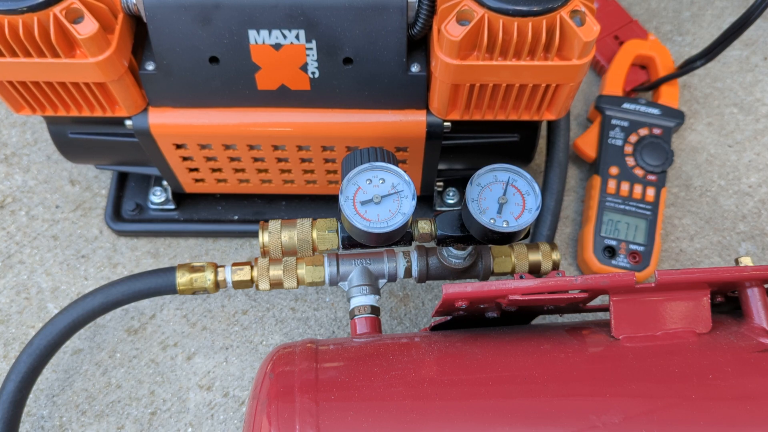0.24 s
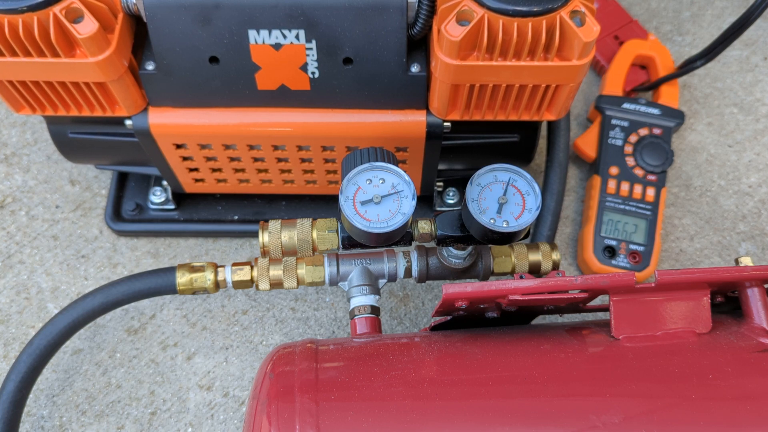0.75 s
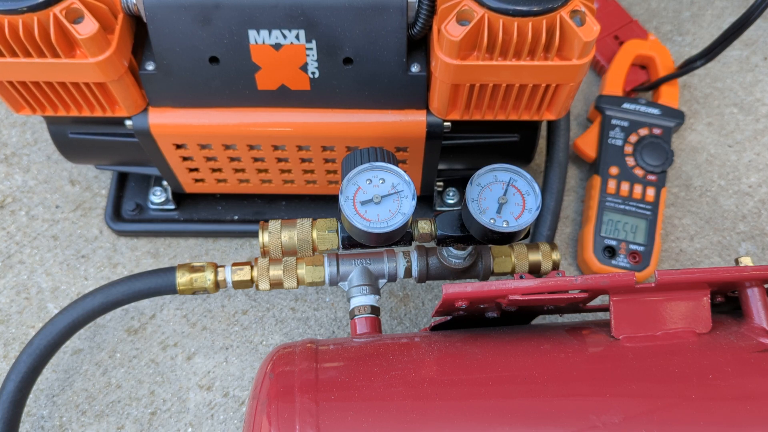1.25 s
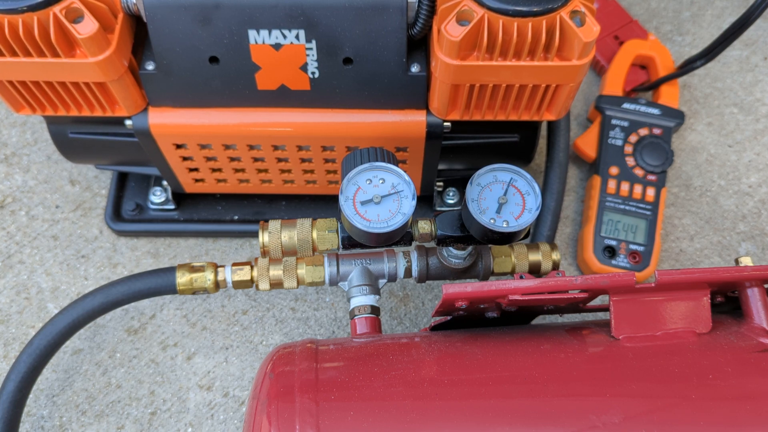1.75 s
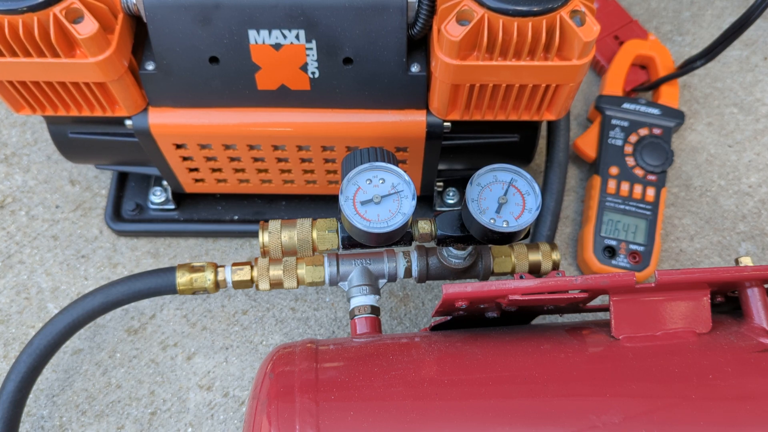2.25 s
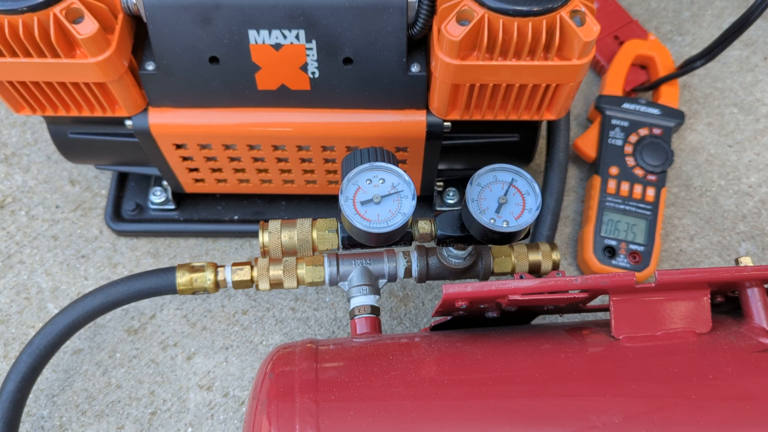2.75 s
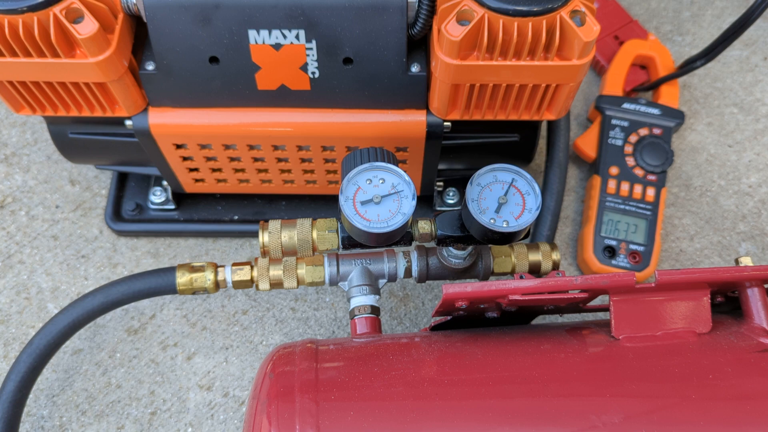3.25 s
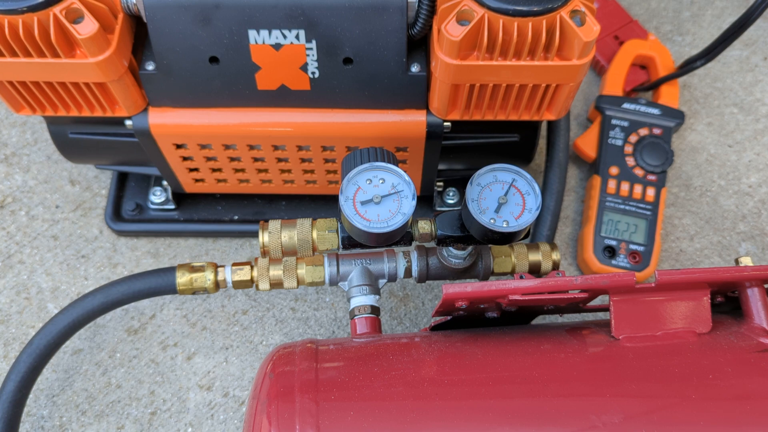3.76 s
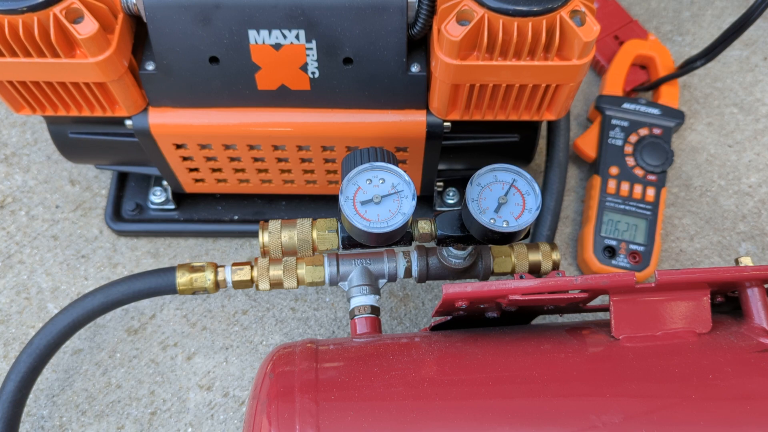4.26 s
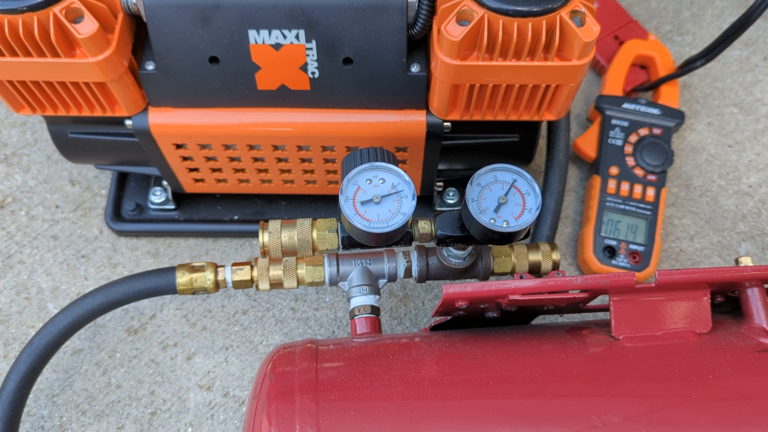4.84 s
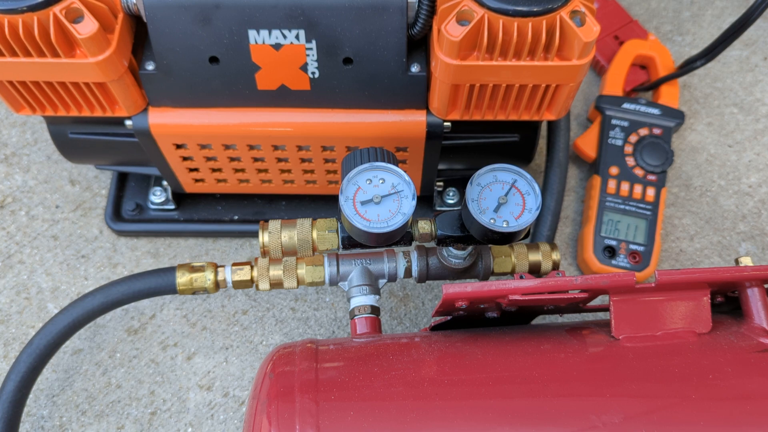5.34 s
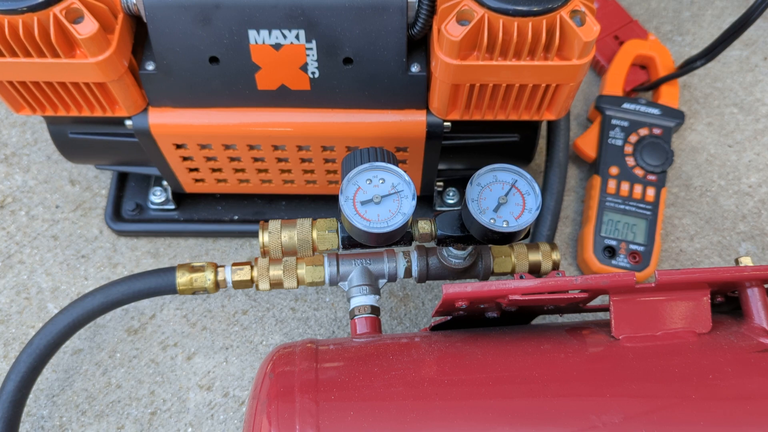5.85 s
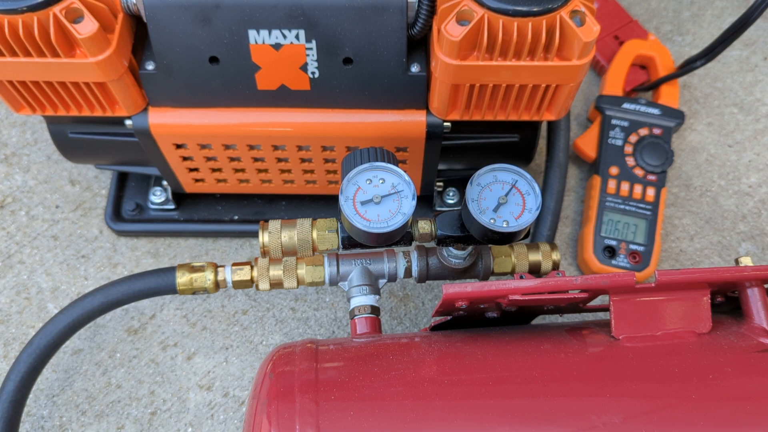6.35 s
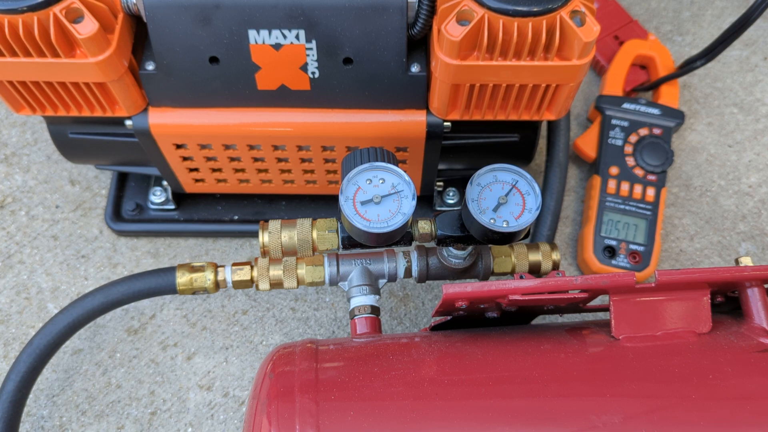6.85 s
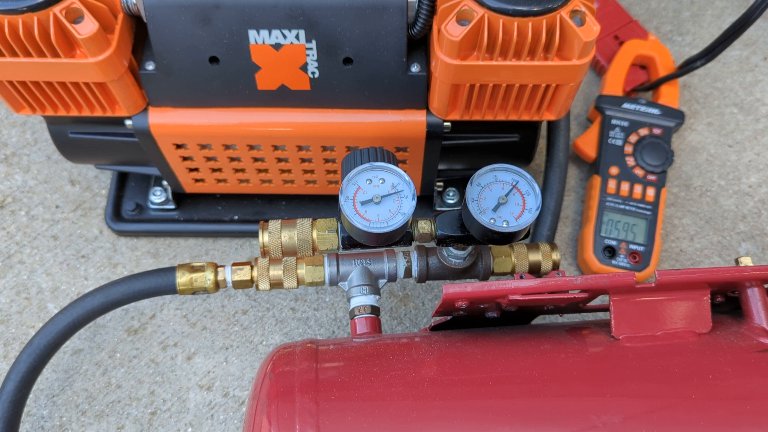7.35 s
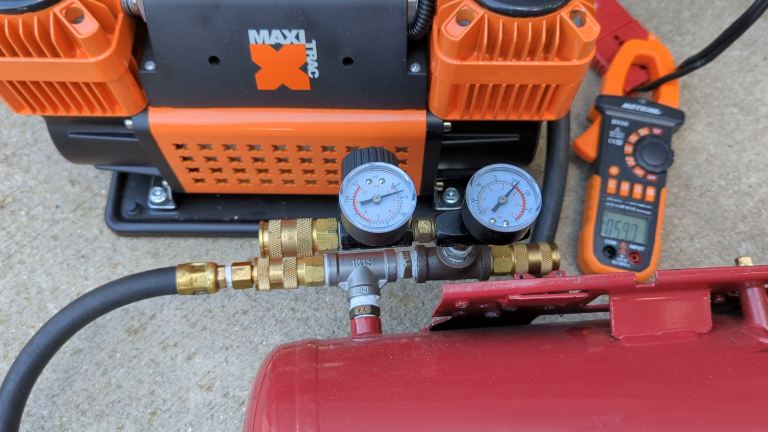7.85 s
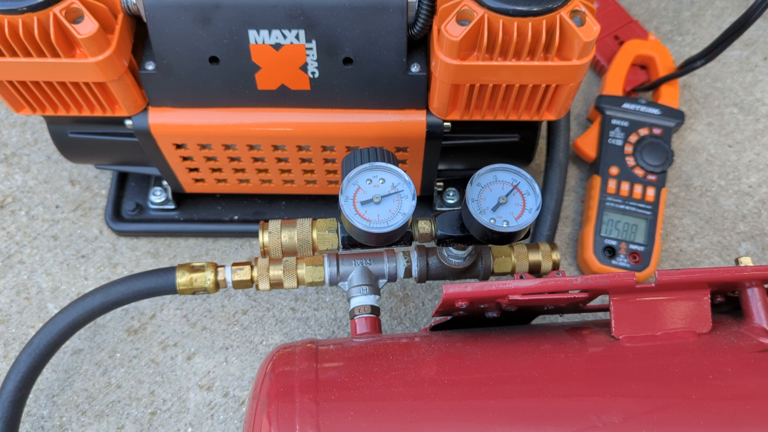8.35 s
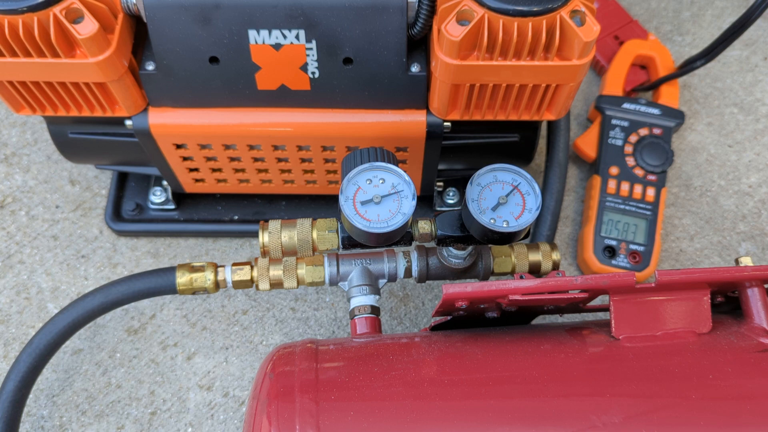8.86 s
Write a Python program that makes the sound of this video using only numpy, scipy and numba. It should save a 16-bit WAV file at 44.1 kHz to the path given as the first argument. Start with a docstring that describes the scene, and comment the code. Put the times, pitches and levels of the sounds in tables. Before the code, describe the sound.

From 0 seconds the compressor is already at full loudness and it never stops through about 9 seconds. Its piston knocks come roughly 73 times a second, fusing into a hard, rough, buzzing drone, strongest from low bass at about 150 Hz through a nasal midrange near 600 to 2,200 Hz. Pitch climbs smoothly by only about two thirds of a semitone, to 75 turns a second. Valve hiss pulses four times per turn, too fast to count, with shimmering metallic rattle above 4 kHz whose grain slowly changes. Hiss and rattle are fullest near 0.6 seconds, dip around 5, and recover slightly by 6. The tonal balance shifts gradually until about 6 seconds, then holds. A slightly left-leaning eight-cylinder engine idles far below, a low burble near 50 to 150 Hz with faint rustling ticks six times a second. Close, wide, dry, outdoors, nearly saturated.

```python
"""On a concrete floor, a small twin-piston compressor pumps a tank while an eight-cylinder engine idles beside it.
The compressor is a stack of tones at multiples of its slowly rising shaft rate: one knocking wave every turn.
Noise that puffs four times a turn is the air hiss; a slowly changing pattern of strikes rings the metal as rattle.
The engine is a comb of low tones at multiples of its cycle rate, with a rustle of noise once a cycle.
"""
import sys
import numpy as np
from scipy import signal
from scipy.fft import rfft, irfft
from scipy.io import wavfile
from scipy.ndimage import uniform_filter1d, map_coordinates
from numba import njit

SR = 44100
rng = np.random.default_rng(int(sys.argv[2]) if len(sys.argv) > 2 else 0)


def dump(signal):
    """Clip the signal to [-1, 1] and save it as 16-bit WAV at the path in sys.argv[1]."""
    limited = np.clip(np.atleast_2d(signal).T, -1, 1)
    pcm = np.round(limited * 32767).astype(np.int16)
    wavfile.write(sys.argv[1], SR, pcm)


N = 401310  # length in samples
STEP = 256  # samples between points of the slow control grid

# Exhaust tones of the engine: cycle_multiple (8 is the firing rate), level_db (rms, before pan and swell)
EXHAUST_TONES = [(8, -39.5), (10, -43), (12, -65), (13, -35), (14, -43), (15, -44.5), (16, -28.5),
                 (18, -43), (19, -44.5), (20, -46), (21, -34), (22, -35.5), (24, -31), (25, -34),
                 (26, -39.5), (28, -56), (29, -49.5), (30, -40.5), (31, -46), (32, -40), (34, -50),
                 (35, -48), (44, -49), (48, -51)]
# Swell of the engine: time_s, swell_db
ENGINE_SWELL = [(0, 0.5), (2, 0), (4, -1.5), (6, -1.5), (9.1, -1)]
# Colour of the air hiss, before its swell: pitch_hz, left_db_per_hz, right_db_per_hz
HISS_COLOUR = [(25, -86, -88), (45, -76, -65), (100, -62, -61), (317, -61, -56.5), (547, -65, -63),
               (950, -63.5, -55.5), (1550, -62.5, -61.5), (2070, -54.5, -62), (2660, -67, -62.5),
               (3530, -70, -68), (4630, -79, -72), (6230, -73.5, -74.5), (8300, -73, -79),
               (8500, -71.5, -77), (16000, -78, -73.5)]
# Swell of hiss and rattle: time_s, swell_db
AIR_SWELL = [(0, 0), (.6, 1), (2, 0.1), (2.7, -1.1), (5.2, -3), (6.2, -1.2), (9.1, -1.5)]
# Puffs as the valves open: place_turns, fade_turns, size (relative to the steady hiss)
VALVE_PUFFS = [(.04, 0.06, 0.6), (0.249, 0.053, 0.5), (.54, 0.099, 0.68), (.8, 0.082, 1)]
# Ringing of cylinder fins and valve plates, before pan and swell:
# pitch_hz, width_hz, low_fill_db_per_hz, high_fill_db_per_hz
METAL_RINGS = [(4150, 310, -72, -64), (5160, 330, -72, -71.5), (5940, 300, -89, -80),
               (6160, 340, -68.5, -70), (7150, 380, -72.5, -74), (8750, 170, -65.5, -73),
               (9120, 240, -76, -71), (10300, 550, -77, -80), (11640, 580, -82, -72.5),
               (12500, 800, -75, -77), (14100, 1500, -73, -74), (15400, 300, -72, -74)]
# Speed of the compressor shaft: time_s, turns_per_s
SHAFT_SPEED = [(0.0, 72.54), (0.25, 72.59), (1.25, 73.1), (2.25, 73.35), (2.95, 73.6), (3.1, 73.87),
               (4.5, 74.21), (5.5, 74.5), (9.1, 75.285)]
# Swell of the knocks: time_s, swell_db
KNOCK_SWELL = [(0, -1.2), (1.5, 0), (3, -0.27), (4.5, -1.1), (6, -0.85), (7.5, -1), (9.1, -1.35)]
# Knock tones, rms before swell: shaft_multiple, low_fill_left_db, low_fill_right_db,
# high_fill_left_db, high_fill_right_db
KNOCK_TONES = [(1, -41, -37, -39, -35.5), (2, -21.5, -23, -24.5, -25), (3, -38, -38, -30.5, -37),
               (4, -23, -23, -26, -24.5), (5, -27.5, -35.5, -29.5, -36.5), (6, -31, -40, -32, -62),
               (7, -71, -29, -32, -37.5), (8, -19, -33, -26.5, -37.5), (9, -24, -29, -19, -22.5),
               (10, -16.5, -14, -22, -27), (11, -27, -24, -23.5, -23), (12, -14.5, -48.5, -23.5, -22),
               (13, -42.5, -18.5, -22, -23), (14, -41.5, -18, -38.5, -22), (15, -22.5, -20.5, -24, -23),
               (16, -23.5, -29.5, -36, -30), (17, -58, -35.5, -34, -47), (18, -28, -24.5, -29.5, -26.5),
               (19, -31, -43, -29.5, -51), (20, -39, -42.5, -34, -34), (21, -41, -25.5, -23, -50),
               (22, -16.5, -22.5, -30.5, -38.5), (23, -30, -27, -30, -32), (24, -41, -79, -25, -27),
               (25, -63, -43, -28, -38), (26, -30.5, -35, -19, -48), (27, -33, -29, -47, -49),
               (28, -21.5, -28, -20.5, -23.5), (29, -34, -36, -28.5, -72), (30, -23.5, -45, -22, -33),
               (31, -32.5, -33, -38, -33), (32, -32.5, -27.5, -32, -39), (33, -42, -54, -44, -48),
               (34, -49, -32, -47.5, -33), (35, -36, -74, -30.5, -57), (36, -32.5, -55, -29, -28),
               (37, -63, -34.5, -39.5, -33.5), (38, -28, -31, -34, -62), (39, -35.5, -80, -45.5, -40.5),
               (40, -61, -53, -51, -69), (41, -29, -57.5, -37.5, -58)]
# When in the turn each pitch range of the knock arrives: pitch_hz, arrival_turns, odd_multiple_shift_rad
# The shift of odd multiples carries the unlikeness of the cylinders; half a wave makes the other one stronger.
KNOCK_ARRIVAL = [(300, .475, -1), (370, .615, -1.5), (745, .65, 0), (820, .52, 0), (965, .545, -2),
                 (1300, .53, -2.6), (1420, .35, -3.2), (1850, .35, -4.9), (1960, .53, -4.7),
                 (2250, .57, -4.7)]
# How far the knock at the left microphone runs ahead of the right: pitch_hz, lead_rad
LEFT_LEAD = [(74, 0.17), (370, 0.25), (480, 2), (600, 0.055), (800, 1.27), (960, 0.68), (1110, 1.48),
             (1200, 1.85), (1340, 1.18), (1460, 2.9), (1630, 2.75), (1920, 1.68), (2070, 1.7), (2370, 0.15),
             (2550, 1.84), (2900, 2.77)]
# Knock tones that swell or sink on the way: shaft_multiple, half_fill_db
MIDWAY_SWELL = [(8, -0.5), (10, -2.5), (12, 2), (14, -3), (15, -2), (16, 2), (17, 5.5), (19, -1), (21, -1),
                (22, 0.5), (23, 3), (25, -5), (27, 1.5), (30, 1.5), (31, -1.5), (34, -4), (35, -5), (36, 4),
                (38, -8.5), (39, -5), (41, 4.5)]

# Engine: four-stroke cycles per second, and place in the cycle at the start
ENGINE_CYCLE_HZ, ENGINE_START_CYCLES = 6.0066, .0098
ENGINE_WAVER_DB, ENGINE_PAN_DB = -0.5, 1.2  # spread of the random drift; left louder than right
TICK_DB, TICK_HZ, TICK_FADE_CYCLES = -45, 7000, 0.088  # valve-train rustle, before the engine swell
ALIKE_HZ = 393  # the likeness of left and right hiss has fallen to half here
AIR_WAVER_DB = 0.4
RATTLE_RENEW_S, RATTLE_PAN_DB = 1.65, 2.5  # time for one pattern to turn into the next; left over right
FILL_S = 6.13  # the fill climbs evenly and levels off here
SHAFT_WAVER_TURNS = 0.0015
KNOCK_WAVER_DB, KNOCK_WAVER_RAD, KNOCK_FLUTTER_DB = 0.5, 0.079, 0.16  # each tone's drift; drift of all together
# Weak higher knock tones: how many, level of the first, fall per multiple, random unevenness
BUZZ_COUNT, BUZZ_DB, BUZZ_FALL_DB, BUZZ_SCATTER_DB = 19, -49, 1.2, 5
CEILING, KNEE = .99, 5  # highest peak, and how sharply peaks bend towards it
TOP_HZ = 15700


def undb(db):
    """Turn dB into a gain."""
    return 10 ** (np.asarray(db) / 20)


def coarse():
    """Times of the control grid, in seconds."""
    return np.arange(N // STEP + 2) * STEP / SR


def fine(values):
    """Slide from control grid point to point, to get a value for every sample."""
    return np.interp(np.arange(N) / SR, coarse(), values)


def walk(rate):
    """Random drift on the control grid: smoothed noise, about rate changes a second, spread 1."""
    width = max(int(SR / STEP / rate), 1)
    noise = rng.standard_normal(N // STEP + 2)
    drift = uniform_filter1d(uniform_filter1d(noise, width), width)
    return drift / drift.std()


def curve(table):
    """Read a table of times and values onto the control grid."""
    return np.interp(coarse(), *np.transpose(table))


@njit
def add_tones(out, turns, size, step):
    """Add multiples 1, 2, .. of a rotation; complex size[side, multiple, grid point] holds level and phase."""
    for i in range(len(turns)):
        j, part = i // step, (i % step) / step
        spin, wave = np.exp(2j * np.pi * turns[i]), 1. + 0j
        for k in range(size.shape[1]):
            wave *= spin  # one more spin gives the next multiple
            for side in range(2):
                now = size[side, k, j] * (1 - part) + size[side, k, j + 1] * part
                out[side, i] += (now * wave).real
    return out


def engine():
    """Uneven firings over the cycle give a comb of low tones, strongest at two and three times the firing rate."""
    cycle = ENGINE_CYCLE_HZ * np.arange(N) / SR + ENGINE_START_CYCLES
    size = np.zeros((2, round(EXHAUST_TONES[-1][0]), len(coarse())), complex)
    pan_db = np.array([[ENGINE_PAN_DB / 2], [-ENGINE_PAN_DB / 2]])
    for multiple, db in EXHAUST_TONES:
        k = round(multiple)
        # tones between the firing multiples start at a random phase
        start = rng.uniform(0, 2 * np.pi) * (k % 8 > 0)
        level_db = db + ENGINE_WAVER_DB * walk(3) + pan_db
        size[:, k - 1] = np.sqrt(2) * undb(level_db) * np.exp(1j * start)
    # the rustle jumps up at the start of each cycle, then fades
    band = signal.butter(1, [TICK_HZ / 2, TICK_HZ * 2], "band", fs=SR, output="sos")
    rustle = signal.sosfilt(band, rng.standard_normal((2, N)))
    ticks = rustle * np.exp(-(cycle % 1) / TICK_FADE_CYCLES)
    return add_tones(undb(TICK_DB) * ticks / ticks.std(), cycle, size, STEP)


def puffs(turns):
    """Air strength over the turn, rms 1: a jump at each valve opening, then a fade."""
    puff = np.ones(N)
    for place, fade, size in VALVE_PUFFS:
        puff = puff + size * np.exp(-((turns - place) % 1) / fade)
    return puff / np.sqrt(np.mean(puff ** 2))


def hiss(turns):
    """Air through the valves and cooling fan: noise that is fresh every turn, alike left and right only in the bass."""
    f = np.maximum(np.fft.rfftfreq(N, 1 / SR), 1)
    hz, *sides = np.transpose(HISS_COLOUR)
    left, right = rfft(puffs(turns) * rng.standard_normal((2, N)))
    alike = 1 / (1 + (f / ALIKE_HZ) ** 2)
    right = alike * left + np.sqrt(1 - alike ** 2) * right
    colour_db = [np.interp(np.log(f), np.log(hz), db) for db in sides]
    colour = undb(colour_db) * np.sqrt(SR / 2)  # from level per Hz to the whole band
    return irfft(colour * np.array([left, right]), N)


def metal_ring(column):
    """Ringing of all the metal parts added up, each a resonance with its own pitch and width."""
    f = np.fft.rfftfreq(N, 1 / SR)
    ring = 0
    for mode in METAL_RINGS:
        hz, width = mode[:2]
        ring = ring + undb(mode[column]) * 1j * f * width / (hz ** 2 - f ** 2 + 1j * f * width)
    return ring


def rattle(turns, fill):
    """Loose parts strike at the same places every turn; the pattern wears into a new one and rings the metal."""
    points, top = 4096, 240  # points in a turn's pattern; its fineness in multiples of the shaft rate
    age = np.arange(N) / SR / RATTLE_RENEW_S
    blend = np.sqrt((1 - age % 1) ** 2 + (age % 1) ** 2)  # keeps the level even between patterns
    rings = [metal_ring(2), metal_ring(3)]
    out = []
    for pan_db in (RATTLE_PAN_DB / 2, -RATTLE_PAN_DB / 2):
        pattern = irfft(rfft(rng.standard_normal((20, points)))[:, :top], points)
        place = turns % 1 * (points - 1)
        strikes = map_coordinates(pattern, [age, place], order=1) / blend * puffs(turns)
        bandwidth_hz = top * SHAFT_SPEED[0][1]
        strikes = rfft(strikes / pattern.std()) * np.sqrt(bandwidth_hz) * undb(pan_db)
        low, high = (irfft(strikes * ring, N) for ring in rings)
        out.append(low + fine(fill) * (high - low))
    return np.array(out)


def knocks(turns, fill):
    """A wave that repeats each turn is a sum of shaft-rate multiples; their balance shifts as the tank fills."""
    higher = np.arange(BUZZ_COUNT)[:, None]
    scatter_db = BUZZ_SCATTER_DB * rng.standard_normal((BUZZ_COUNT, 4))
    buzz_db = BUZZ_DB - BUZZ_FALL_DB * higher + scatter_db
    gains = undb(np.vstack([np.array(KNOCK_TONES)[:, 1:], buzz_db]))
    order = np.arange(1, len(gains) + 1)
    hz, when, odd = np.transpose(KNOCK_ARRIVAL)
    tone_hz = order * curve(SHAFT_SPEED).mean()
    # adding up the arrival times from tone to tone gives each tone's phase
    angle = -2 * np.pi * np.cumsum(np.interp(tone_hz, hz, when))
    angle = angle + np.interp(tone_hz, hz, odd) * (order % 2)
    lead = np.interp(tone_hz, *np.transpose(LEFT_LEAD))
    midway_db = {round(k): db for k, db in MIDWAY_SWELL}
    size = np.zeros((2, len(order), len(fill)), complex)
    for k, gain in enumerate(gains):
        swell_db = midway_db.get(k + 1, 0) * np.sin(np.pi * fill) ** 2
        for side in range(2):
            low, high = gain[side::2]
            phase = angle[k] - side * lead[k] + KNOCK_WAVER_RAD * walk(17)
            waver = undb(swell_db + KNOCK_WAVER_DB * walk(27))
            size[side, k] = np.sqrt(2) * (low + fill * (high - low)) * waver * np.exp(1j * phase)
    return add_tones(np.zeros((2, N)), turns, size, STEP)


def scene():
    """Add the idling engine, the compressor's air and rattle, and its knocks."""
    turns = np.cumsum(fine(curve(SHAFT_SPEED))) / SR + fine(SHAFT_WAVER_TURNS * walk(14))
    fill = np.clip(coarse() / FILL_S, 0, 1)
    engine_sound = engine() * fine(undb(curve(ENGINE_SWELL)))
    air_gain = fine(undb(curve(AIR_SWELL) + AIR_WAVER_DB * walk(5)))
    air_sound = air_gain * (hiss(turns) + rattle(turns, fill))
    knock_gain = fine(undb(curve(KNOCK_SWELL) + KNOCK_FLUTTER_DB * walk(11.5)))
    return engine_sound + air_sound + knocks(turns, fill) * knock_gain


def record(dry):
    """Bend the loudest peaks smoothly under the ceiling, then cut the very highest treble."""
    soft = dry / (1 + np.abs(dry / CEILING) ** KNEE) ** (1 / KNEE)
    treble_cut = signal.ellip(16, .2, 60, TOP_HZ, fs=SR, output="sos")
    return signal.sosfilt(treble_cut, soft)


dry = scene()
out = record(dry)
dump(out)
```